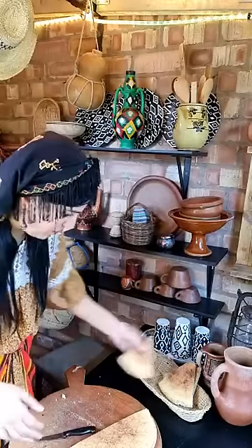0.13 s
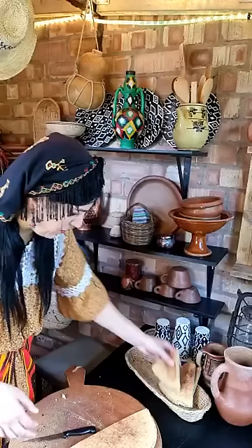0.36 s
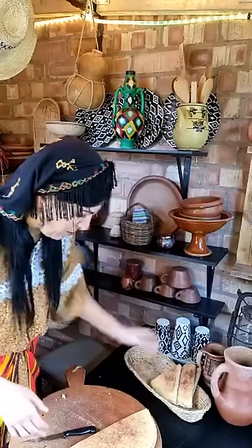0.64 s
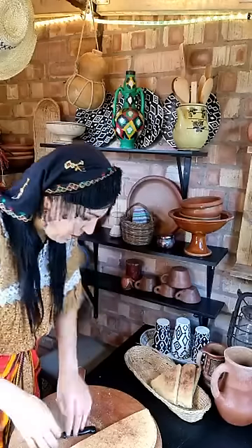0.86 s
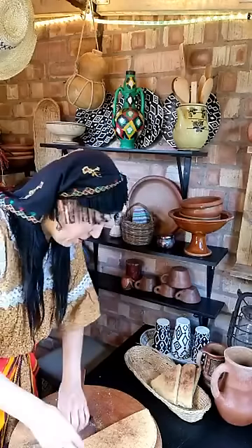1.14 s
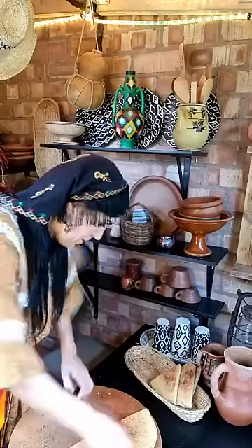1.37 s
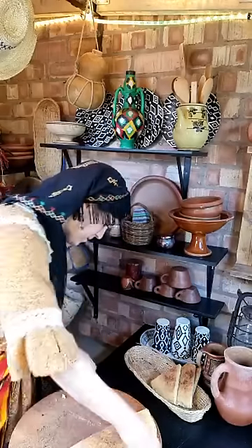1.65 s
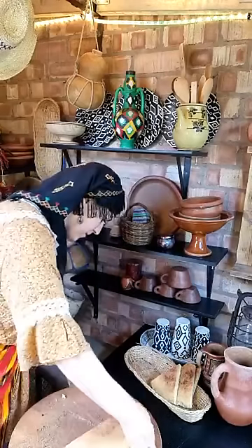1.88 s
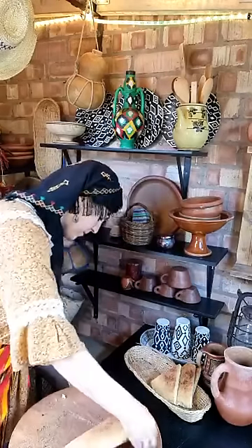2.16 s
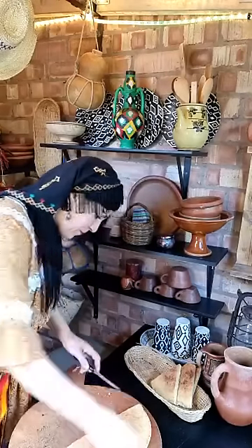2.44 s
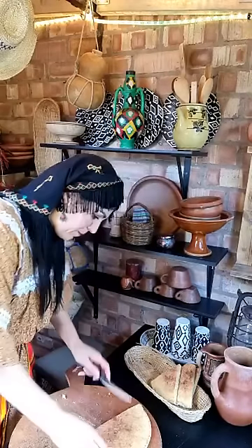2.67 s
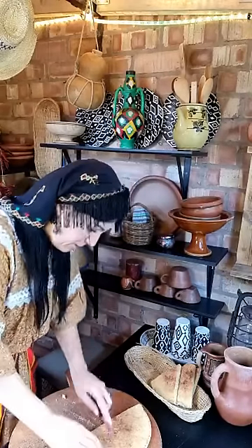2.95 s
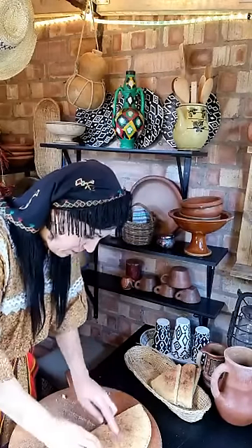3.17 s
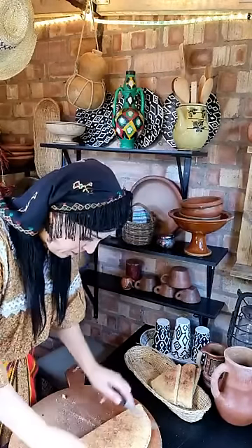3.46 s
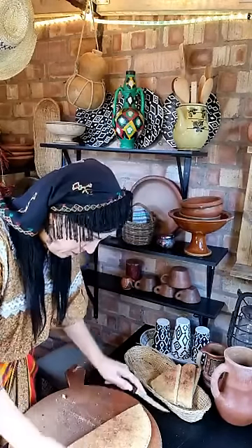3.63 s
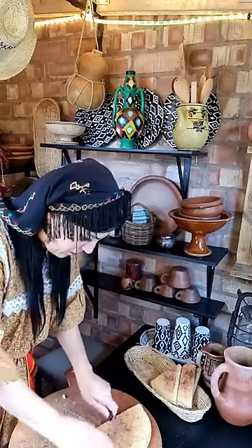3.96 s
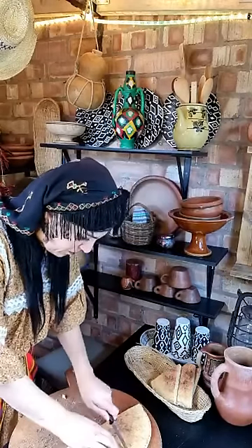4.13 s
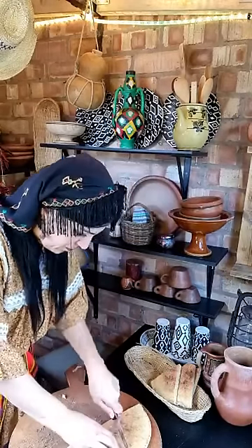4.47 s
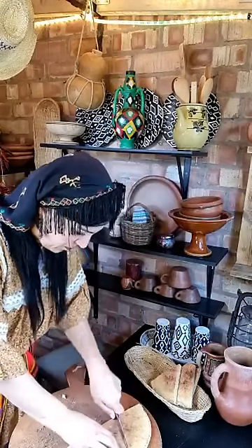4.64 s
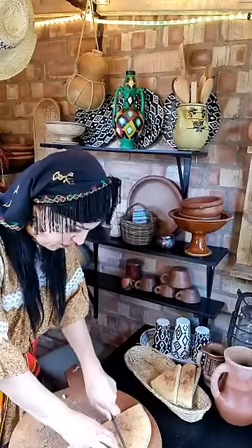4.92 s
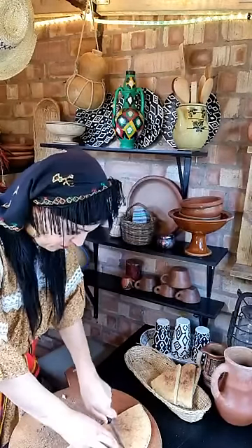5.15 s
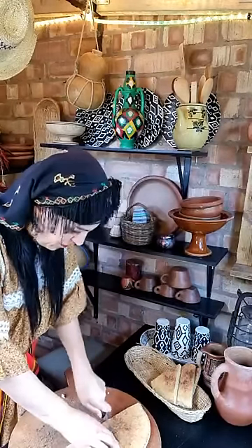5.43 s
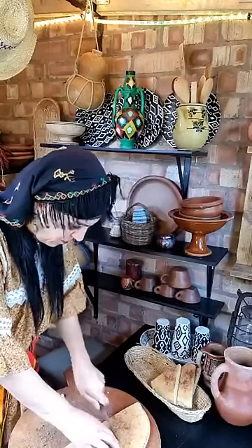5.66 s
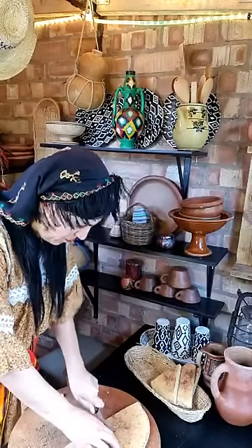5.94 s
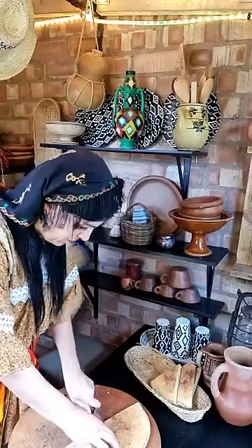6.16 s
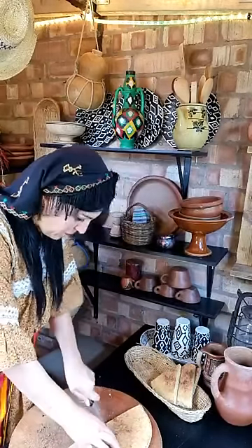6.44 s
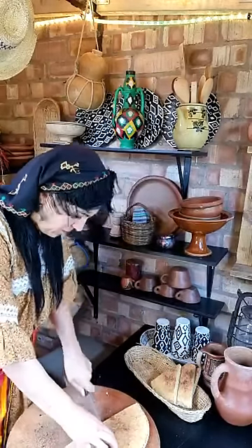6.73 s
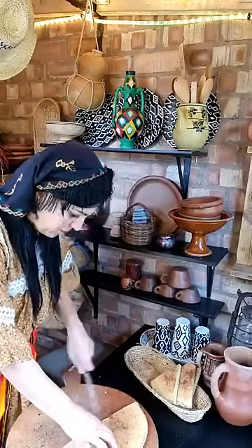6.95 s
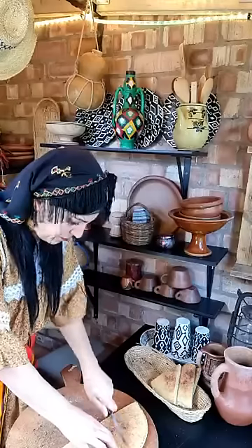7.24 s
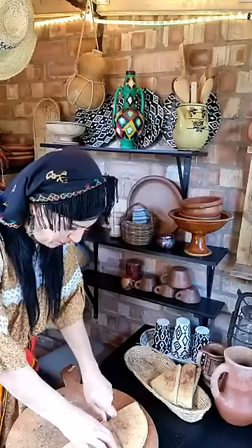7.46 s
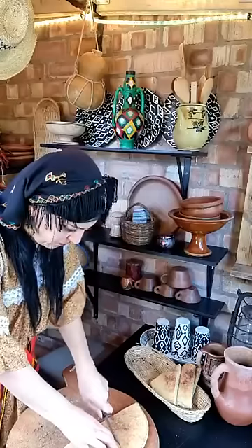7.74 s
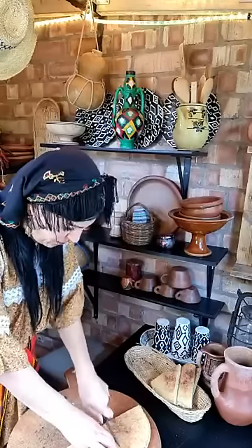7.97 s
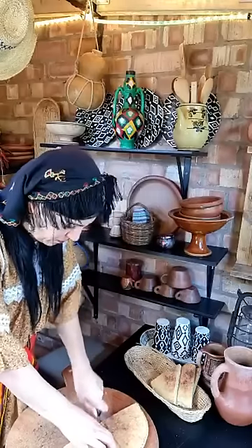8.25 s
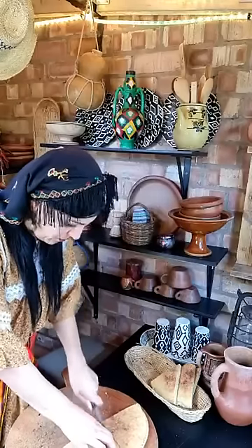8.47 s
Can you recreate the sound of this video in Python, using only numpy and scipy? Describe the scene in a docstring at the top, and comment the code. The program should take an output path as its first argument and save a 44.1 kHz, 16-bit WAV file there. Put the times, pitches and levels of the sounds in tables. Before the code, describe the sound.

In a small, faintly humming kitchen, bread brushes and taps a wooden board. After a quiet gap the board bangs hard on the table in a quick double knock with small rattles. A pause follows, then a knife saws crisp crust in short, uneven scrapes with tiny snaps and light knocks. Close single microphone, short room reflections.

```python
"""A flatbread and a knife are handled on a wooden board in a small, quietly humming kitchen.
First the bread slides over the board with light taps; just after 2.3 s the board is knocked hard on the table.
From about 4.6 s the knife saws through the crust in short strokes, with a few more light knocks.
The hum is shaped noise, a knock sets the board's tones ringing and the room answers with fading noise,
and bread and blade are made of random clicks that shake the board, tear the crust and hiss."""
import sys
import numpy as np
from scipy import signal
from scipy.io import wavfile

SR = 44100
rng = np.random.default_rng(int(sys.argv[2]) if len(sys.argv) > 2 else 0)


def wrap_up_sound(samples):
    """Save the sound to the file named by the first command line argument, as 16-bit audio."""
    columns = np.atleast_2d(samples).T
    # keep every value between -1 and 1, then stretch to whole-number steps
    tamed = np.clip(columns, -1, 1)
    steps = np.round(tamed * 32767).astype(np.int16)
    wavfile.write(sys.argv[1], SR, steps)


N = 379260   # length in samples


def amp(db):
    """Turn decibels into a plain multiplier."""
    return 10 ** (np.asarray(db) / 20)


def rms_one(x):
    """Scale a sound to an average (rms) level of 1."""
    return x / np.sqrt(np.mean(x ** 2) + 1e-20)


def in_time(rows):
    """Draw a level curve through (seconds, dB) points and return it as a gain."""
    seconds, db = np.transpose(rows)
    return amp(np.interp(np.arange(N) / SR, seconds, db))


def at_hz(points, hz):
    """Read a curve at one pitch, with straight lines on a logarithmic pitch scale."""
    point_hz, values = np.transpose(points)
    return np.interp(np.log(hz), np.log(point_hz), values)


def drift(rate_hz):
    """Slow random wandering of spread 1: smoothed noise, made at every 40th sample and joined by lines."""
    step = 40
    r = np.exp(-2 * np.pi * rate_hz * step / SR)
    noise = rng.standard_normal(N // step + 2002)
    slow = signal.lfilter([1], [1, -2 * r, r * r], noise)[2000:]   # skip the filter's start
    return np.interp(np.arange(N) / step, np.arange(len(slow)), rms_one(slow))


def ring(drive, hz, t60):
    """A resonance: a unit click starts a sine of height 1 that falls 60 dB in t60 seconds."""
    r = amp(-60 / (t60 * SR))
    w = 2 * np.pi * hz / SR
    return signal.lfilter([0, np.sin(w)], [1, -2 * r * np.cos(w), r * r], drive + 1e-18)


def dying(clicks, t60):
    """An envelope that jumps at each click and falls 60 dB in t60 seconds."""
    return signal.lfilter([1], [1, -amp(-60 / (t60 * SR))], clicks + 1e-18)


def grains(per_s, spread_db):
    """Random clicks of uneven size and either sign, as many tiny slips make; rms 1."""
    sizes = amp(spread_db * np.minimum(rng.exponential(1, N), 5))
    signed = sizes * rng.choice([-1, 1], N)
    return rms_one(signed * (rng.random(N) < per_s / SR))


def bands(sources, spectrum):
    """Third-octave slices weighted by a spectrum, as (Hz, slice); neighbours come from different sources."""
    edges = 22 * 2 ** np.arange(0, 9.7, 1 / 3)
    for k, (low, high) in enumerate(zip(edges, edges[1:])):
        if high > spectrum[0][0] and low < spectrum[-1][0]:
            hz = np.sqrt(low * high)
            sos = signal.butter(2, [low, high], "band", fs=SR, output="sos")
            yield hz, amp(at_hz(spectrum, hz)) * signal.sosfilt(sos, sources[k % 2])


def patchy(sources, spectrum, patchy_db, rate_hz):
    """Coloured noise whose bands swell and sink on their own; rms 1."""
    return rms_one(sum(band * amp(patchy_db * drift(rate_hz)) for hz, band in bands(sources, spectrum)))


# Colour of the room rumble and microphone hiss.
# Each row: pitch in Hz, relative level in dB per Hz.
HUM_SPECTRUM = [(15, -38), (25, -5.5), (161, -7.5), (189, -16), (241, -12.5), (512, -23.5), (618, -22.5),
                (1870, -34), (2650, -48), (3970, -42), (15700, -51)]
# Standing waves of the room, where the hum is stronger.
# Each row: pitch in Hz, width in Hz, relative level in dB.
ROOM_TONES = [(80, 7.1, -6.5), (160, 14, -3.5), (250, 34, -10), (320, 30, -16), (650, 73, -14.5),
              (933, 170, -15.5)]
# How loud the whole hum is over time. Each row: time in seconds, level in dB.
HUM_LEVEL = [(0.0, -49), (0.24, -58.5), (2.42, -58), (2.92, -64.5), (3.6, -63.5), (4.2, -59.5), (4.6, -60),
             (7.1, -62), (7.5, -60.5), (8.6, -58)]


def hum():
    """Room noise, stronger on the standing waves; the background level sinks after the hard knock and slowly
    comes back."""
    white = rng.standard_normal(N)
    tones = 0
    for hz, width_hz, db in ROOM_TONES:
        t60 = np.log(1000) / (np.pi * width_hz)   # a narrow resonance rings longer
        tones = tones + amp(db) * rms_one(ring(white, hz, t60))
    broad = patchy(rng.standard_normal((2, N)), HUM_SPECTRUM, patchy_db=3.13, rate_hz=4)
    return in_time(HUM_LEVEL) * rms_one(broad + amp(-1.0) * tones)


# Blows on the board.
# Each row: start in seconds, strength in dB at 300 Hz, brightness in dB per octave.
BLOWS = [(0.553, -34, -10), (1.107, -49, 7.5), (2.345, -6, 2.5), (2.349, -2, -2.5), (2.369, -7, 1),
         (2.393, -12.5, 1.5), (2.431, -31.5, 4.5), (2.465, -22, 1), (2.492, -24.5, -3), (6.497, -39, 0),
         (7.925, -29.5, -1.5), (8.376, -44, -9), (8.451, -38.5, -7)]
# Ringing tones (modes) of board and table.
# Each row: pitch in Hz, relative strength in dB, undamped time in seconds to fall 60 dB.
BOARD_MODES = [(53.42, -31, 0.45), (75, -16.5, .35), (117, -14.5, 0.22), (132, -25.5, 0.22), (148, -18, .3),
               (231.5, -21.5, 0.24), (276.5, -13.5, 0.15), (353.5, -16.5, 0.15), (397, -24, 0.15),
               (409.5, -19.5, 0.19), (421, -18, 0.24), (457, -25.5, 0.2), (505.8, -29.5, 0.35),
               (578, -37.5, .25), (646, -21.5, 0.14), (823.4, -25, 0.17), (1003.3, -31, 0.18),
               (1059.3, -27, 0.11)]
# Colour of the kitchen's answer to a blow. Each row: pitch in Hz, relative level in dB per Hz.
KITCHEN_SPECTRUM = [(200, -27), (300, 1.5), (420, 8.5), (600, -2), (1000, -7.5), (1730, -15), (2100, -21),
                    (4800, -31.5), (7500, -47.5), (15700, -48.5)]
# How long that answer lasts. Each row: pitch in Hz, time in seconds to fall 60 dB.
KITCHEN_T60 = [(500, .25), (1200, .3), (2500, 0.33), (6000, 0.18), (12000, 0.18)]
LONGEST_RING_S = 0.4   # no tone of the board takes longer than this to fall 60 dB after a knock


def knocks():
    """Each blow cracks, rings the board's modes, and the kitchen answers with noise dying band by band."""
    seconds, strength_db, bright_db = np.transpose(BLOWS)
    at = np.round(seconds * SR).astype(int)
    # every blow strikes each mode a little differently
    uneven_db = rng.normal(0, 1, (len(at), len(BOARD_MODES)))

    def clicks(hz, extra_db):
        """One click per blow, as strong as the blow is at this pitch."""
        train = np.zeros(N)
        train[at] = amp(strength_db + bright_db * np.log2(hz / 300) + extra_db)
        return train

    body = 0
    for k, (hz, db, t60) in enumerate(BOARD_MODES):
        blows = (-1) ** k * clicks(hz, db + 6.0 + uneven_db[:, k])
        ringing = ring(blows, hz, min(t60, LONGEST_RING_S))
        # taking off a short ring lets the tone build up over some cycles
        body = body + ringing - 0.3 * ring(blows, hz, 12 / hz)
    # wood meets wood softly
    body = signal.sosfilt(signal.butter(2, [45, 1500], "band", fs=SR, output="sos"), body)

    slices = list(bands(rng.standard_normal((2, N)), KITCHEN_SPECTRUM))
    answer = 0
    for hz, band in slices:
        crack = dying(clicks(hz, -9.0), 0.06) * (700 < hz < 5500)   # the first contact is short and hard
        room = dying(clicks(hz, -19.0), at_hz(KITCHEN_T60, hz))
        answer = answer + band * (room + crack)
    return body + answer / np.std(sum(band for hz, band in slices))


def shaken(drive, low_hz, high_hz, damping):
    """The board's modes between two pitches under random clicks, damped by the hand; rms 1."""
    total = 0
    for k, (hz, db, t60) in enumerate(BOARD_MODES):
        if low_hz <= hz < high_hz:
            total = total + (-1) ** k * amp(db) * ring(drive, hz, damping * t60)
    return rms_one(total)


# Bread slides over the board, then the knife saws.
# Each row: time of full strength in seconds, swell in seconds, hold in seconds, then four strengths in dB:
# table rocking, board shake, crust tearing, blade hiss.
STROKES = [(.505, 0.027, 0.043, -67, -82, -83, -60.5), (.545, 0.016, 0.016, -33.5, -39.5, -45.5, -48.5),
           (.61, 0.086, 0.015, -54, -46, -45, -55), (.665, .08, .015, -46, -48.5, -56.5, -56),
           (1.075, 0.11, 0.01, -56, -56, -59, -66), (1.107, 0.052, 0.059, -52, -52.5, -57.5, -60.5),
           (1.62, .12, .17, -62, -62.5, -86, -92), (1.965, 0.15, .045, -51.5, -54, -53.5, -55.5),
           (4.615, 0.068, 0.018, -48.5, -67, -84, -83), (4.775, 0.069, 0.058, -46, -51, -57.5, -56),
           (4.88, 0.12, 0.031, -50, -55, -56, -60.5), (5.02, 0.051, 0.043, -48, -53, -57, -59),
           (5.09, .1, 0.018, -42, -64, -62, -65.5), (5.145, 0.034, 0.06, -47, -53, -49.5, -53.5),
           (5.36, 0.066, 0.098, -47.5, -47.5, -56, -55.5), (5.535, 0.12, 0.019, -45, -49, -46, -47.5),
           (5.71, 0.078, 0.018, -43.5, -51, -56.5, -64.5), (5.76, 0.088, 0.032, -53, -42.5, -51.5, -50),
           (5.875, 0.15, 0.027, -42.5, -44.5, -43.5, -49.5), (6.06, 0.08, 0.018, -47, -60, -62, -72),
           (6.105, 0.11, .015, -53, -53.5, -55.5, -61), (6.225, 0.054, 0.033, -49.5, -54, -60.5, -63),
           (6.31, 0.14, 0.071, -50, -52.5, -55, -57.5), (6.495, 0.029, 0.027, -40.5, -57, -53.5, -66),
           (6.57, .1, 0.038, -44, -48.5, -54, -70.5), (6.675, .1, 0.014, -46, -51.5, -49.5, -56.5),
           (6.81, 0.16, 0.059, -38.5, -41, -43, -51), (6.9, 0.17, 0.044, -45, -42.5, -47, -57.5),
           (6.975, .1, 0.01, -54.5, -48.5, -35.5, -56.5), (7.44, 0.087, .03, -52.5, -63.5, -64.5, -77),
           (7.605, 0.069, 0.094, -46.5, -49.5, -55, -57.5), (7.76, 0.089, .085, -46.5, -46, -54.5, -58),
           (7.93, 0.06, 0.046, -52, -42.5, -42.5, -54.5), (8.05, 0.035, 0.038, -41.5, -46.5, -49.5, -51.5),
           (8.14, 0.14, 0.055, -44.5, -47.5, -49, -57.5), (8.345, 0.055, 0.06, -45, -48, -52.5, -57),
           (8.465, 0.12, 0.057, -54, -46, -47.5, -54.5)]
# How fast each stroke dies, in dB per second: table, board, crust, blade.
FALL_DB_PER_S = (167.5, 215.5, 280, 278)
# The hand holds the bread down while the knife works. Each row: from seconds, to seconds.
PRESSING = [(4.75, 7.03), (7.6, 12)]
# That pressing keeps all four faintly astir. Strengths in dB: table, board, crust, blade.
PRESSING_DB = (-55.5, -63, -72, -97.5)
SWELL_DB, PRESSING_SWELL_S = 30, 0.064   # climb during a swell; swell time of the pressing hand


def stroking():
    """Gains of table, board, crust and blade: each stroke swells, holds and dies, and their powers add."""
    step = 64
    t = np.arange(0, N + step, step) / SR
    fall = np.array(FALL_DB_PER_S)[:, None]
    pressing = [(start, PRESSING_SWELL_S, end - start, *PRESSING_DB) for start, end in PRESSING]
    power = 0
    for full_s, swell_s, held_s, *db in list(STROKES) + pressing:
        climb_db = SWELL_DB / swell_s * np.maximum(full_s - t, 0)
        fall_db = fall * np.maximum(t - full_s - held_s, 0)
        power = power + amp(np.array(db)[:, None] - climb_db - fall_db) ** 2
    return [np.interp(np.arange(N) / SR, t, np.sqrt(layer)) for layer in power]


# Colour of the tearing crust. Each row: pitch in Hz, relative level in dB per Hz.
CRUST_SPECTRUM = [(240, -23), (400, -1.5), (494, -30), (657, 7), (770, -30), (1010, -2), (1560, -8.5),
                  (1990, -22.5), (2410, -15), (5000, -28), (6500, -32), (11000, -120)]
# Colour of the hissing blade. Each row: pitch in Hz, relative level in dB per Hz.
BLADE_SPECTRUM = [(940, -2.5), (1600, -9), (1990, -1.5), (2410, -5), (4760, -6.5), (7380, -15.5),
                  (15700, -15)]
# Single snaps of the crust. Each row: start in seconds, strength in dB.
SNAPS = [(0.544, -38), (0.6194, -31), (4.7296, -41), (5.1424, -47), (5.535, -49), (5.874, -28.5),
         (6.4916, -47), (6.679, -29.5), (6.7528, -29.5), (6.834, -26.5), (8.05, -22), (8.419, -24.5)]


def rubbing():
    """Stick and slip of blade and bread: jolts into table and board, snapping crust, fine hiss."""
    rocking, shake, tearing, hiss = stroking()
    jolts = grains(per_s=1300, spread_db=4.5)
    crumbs = grains(per_s=2500, spread_db=3.5)

    # the legs give
    sway = signal.sosfilt(signal.butter(2, [28, 60], "band", fs=SR, output="sos"), jolts)
    table = rms_one(shaken(jolts, 0, 195, damping=0.4) + amp(-8.0) * rms_one(sway))
    board = shaken(crumbs, 195, 500, damping=0.1)

    crust_grains = [grains(per_s=4000, spread_db=3.0) for source in range(2)]
    crust = patchy(crust_grains, CRUST_SPECTRUM, patchy_db=4.0, rate_hz=3.3)
    crust = rms_one(crust + amp(-4) * shaken(crumbs, 500, 2000, damping=0.42))

    blade_grains = [grains(per_s=19000, spread_db=1.5) for source in range(2)]
    blade = patchy(blade_grains, BLADE_SPECTRUM, patchy_db=3.0, rate_hz=25.6)

    snap_s, snap_db = np.transpose(SNAPS)
    snaps = np.zeros(N)
    snaps[np.round(snap_s * SR).astype(int)] = amp(snap_db - 24.0)   # -24 sets all the snaps' overall level
    strokes = rocking * table + shake * board + tearing * crust + hiss * amp(-1.0) * blade
    return strokes + dying(snaps, 0.15) * blade


def scene():
    """Room hum, knocks and rubbing added together in one channel."""
    return (hum() + knocks() + rubbing())[None]


def record(dry):
    """A null of the room near 195 Hz at the microphone, rounded peaks, and the top cut above 15750 Hz."""
    b, a = signal.iirnotch(195, 4.0, SR)
    heard = signal.lfilter(b, a, dry)
    rounded = 1.5 * np.tanh(heard / 1.5)
    return signal.sosfilt(signal.ellip(12, 0.5, 60, 15750, fs=SR, output="sos"), rounded)


dry = scene()
out = record(dry)
wrap_up_sound(out)
```